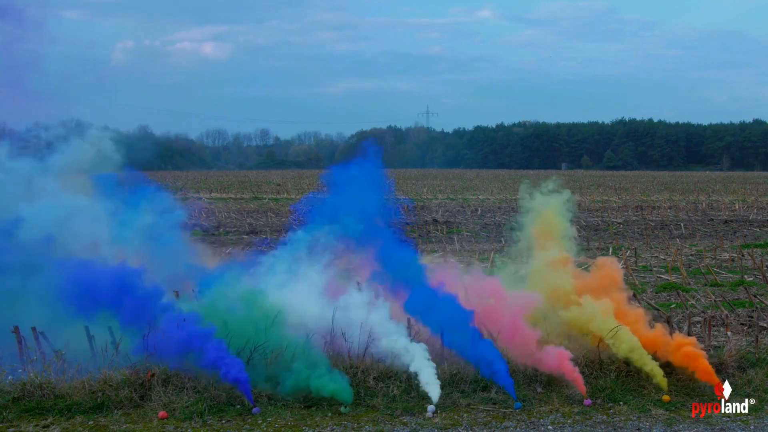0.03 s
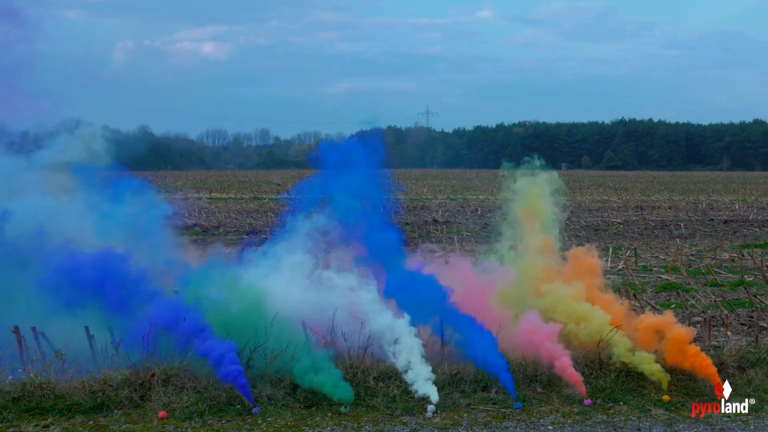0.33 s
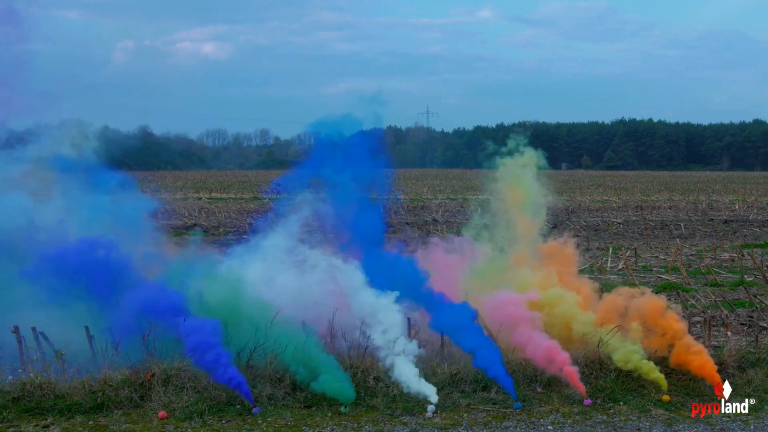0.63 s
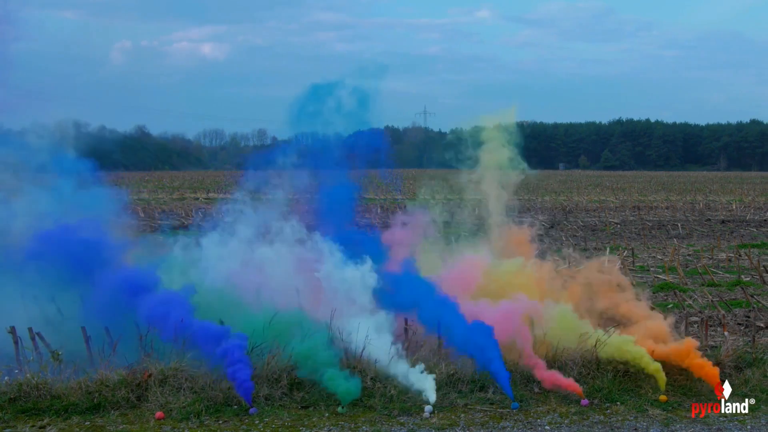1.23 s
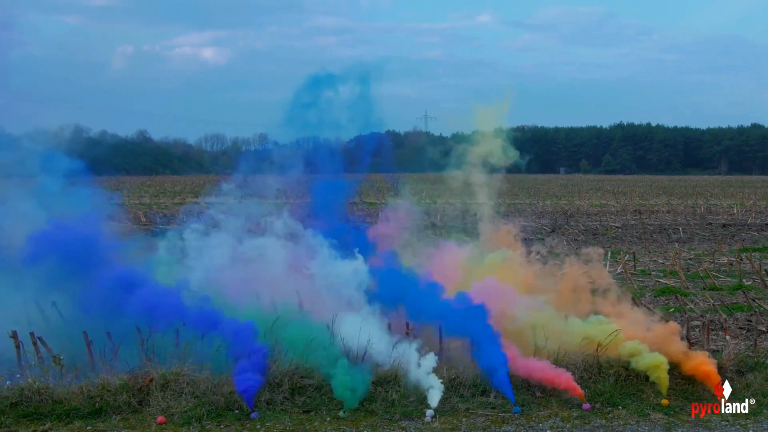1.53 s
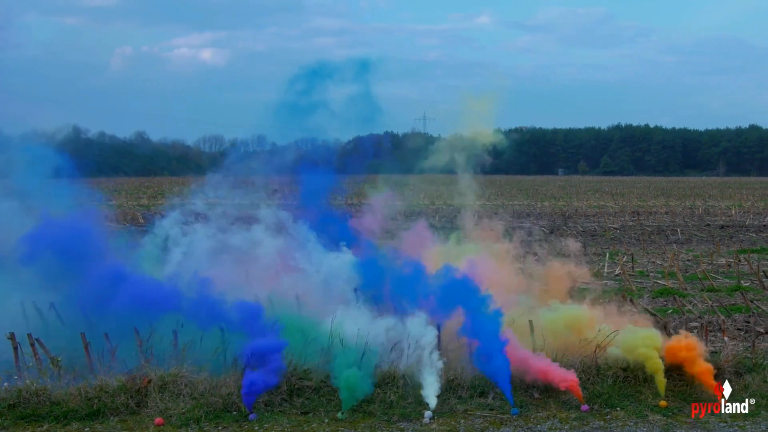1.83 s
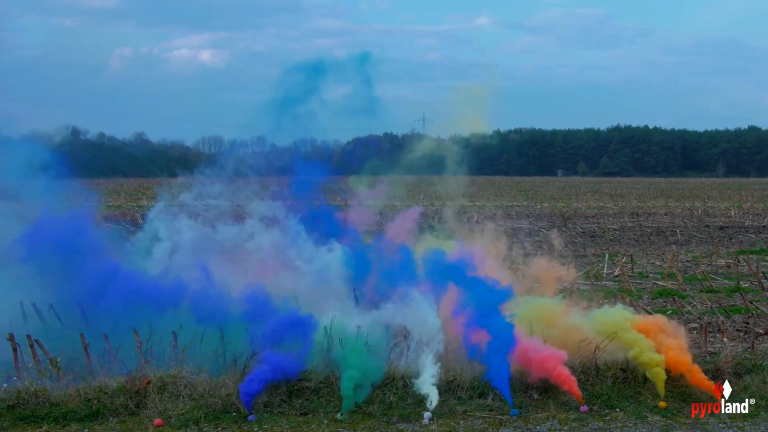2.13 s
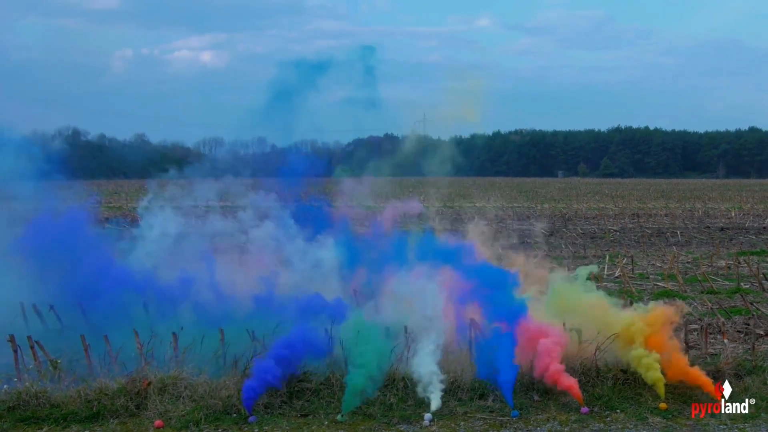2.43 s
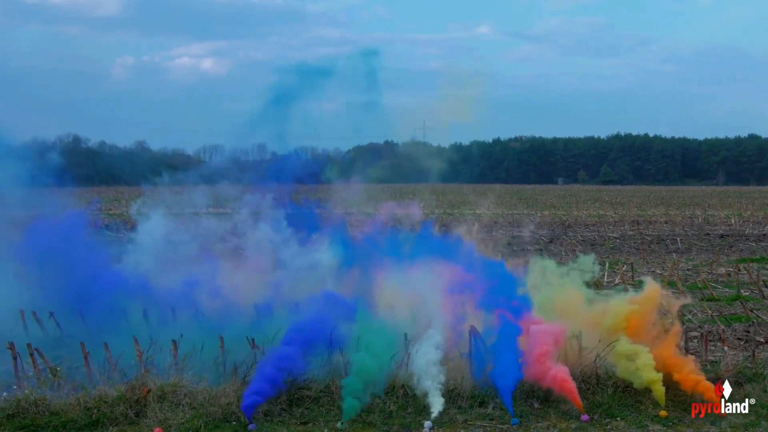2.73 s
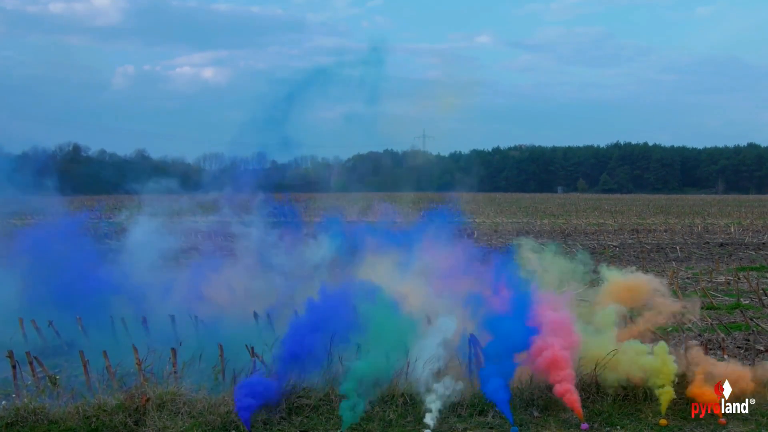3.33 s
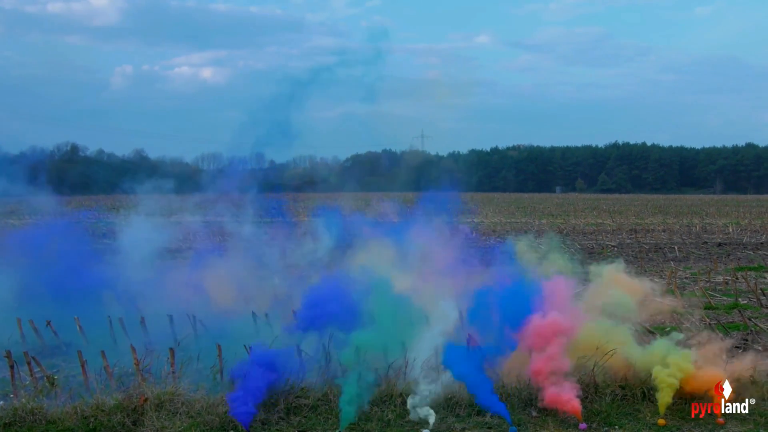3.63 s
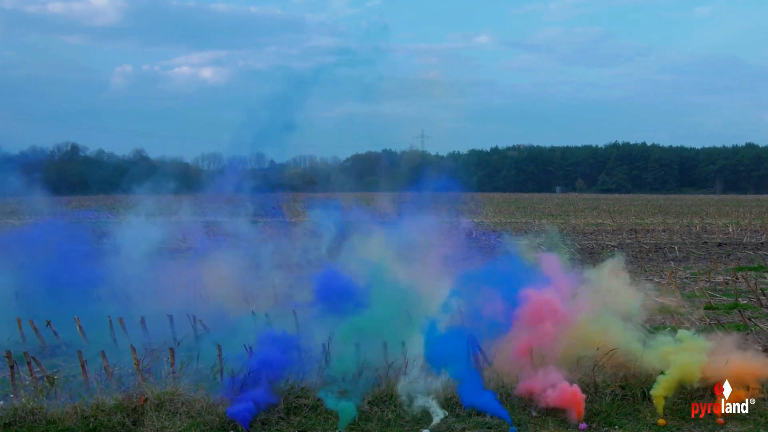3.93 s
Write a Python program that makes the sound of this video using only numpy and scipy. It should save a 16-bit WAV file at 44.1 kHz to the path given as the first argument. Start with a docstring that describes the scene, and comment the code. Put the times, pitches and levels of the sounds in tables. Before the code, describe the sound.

Smoke canisters hiss thin and high for all four seconds in an open field, swirling slightly over a soft rush. Low wind buffets the microphone from the start, mostly on the left, then the right, dying away by about 2.3 seconds. Near 0.8 seconds one canister crackles briefly, ending in a small hollow pop at 0.9. Faint sparks tick around 1.4 and 3.4 seconds.

```python
"""A thin, high hiss under low buffets of wind: a row of smoke devices burns on an open field.
Gas and fine sparks leave the nozzles over the soft rush of the jets; drifting echoes make both swirl.
One charge sputters and pops just before the first second, and two stray sparks tick.
Wind hits the two microphone ports in turn and dies away after two seconds, leaving the
hiss and a faint distant rumble."""
import sys
import numpy as np
from scipy import signal
from scipy.fft import rfft, irfft
from scipy.io import wavfile
from scipy.ndimage import uniform_filter1d

SR = 44100
rng = np.random.default_rng(int(sys.argv[2]) if len(sys.argv) > 2 else 0)


def transcribe(u):
    """Save the signal u as a 16-bit wav file named by the first command-line argument.

    u: samples, shape (n,) or (channels, n), limited to [-1, 1]; the rate is SR.
    q: integer samples, one column per channel.
    """
    v = np.clip(np.atleast_2d(u).T, -1, 1)
    q = np.round(v * 32767).astype(np.int16)
    wavfile.write(sys.argv[1], SR, q)


N = 176400
TIME = np.arange(N) / SR


# Each row: frequency in Hz, density in dB.
HISS_SPECTRUM = [(2500, -32), (4200, -33), (5500, -19), (7000, -12.5), (8500, -8.5), (9300, -4), (10000, 0),
                 (10900, -1), (11800, -8), (13500, -10), (14400, -14.5), (15000, -27)]
AIR_SPECTRUM = [(8000, -30), (11000, -5), (12000, 0), (13500, -2), (14500, -3), (15200, -12)]
# Each row: time in seconds, level in dB.
HISS_LEVEL = [(0, -62.3), (.3, -62), (.7, -63), (1.1, -64), (1.42, -64), (1.49, -61.8), (1.72, -63.3),
              (1.85, -64.3), (1.97, -63.3), (2.06, -65.3), (2.13, -63.8), (2.5, -65.3), (2.65, -65),
              (2.8, -62.5), (2.92, -61.6), (3.1, -64.2), (3.27, -64.6), (3.42, -62.7), (3.54, -64.6),
              (4, -65)]
AIR_LEVEL = [(0, -68), (.25, -67), (.7, -73), (1.2, -76), (1.6, -81), (2, -90), (3.2, -78), (3.42, -71),
             (3.55, -91), (4, -84)]

def hiss(sparks_per_s=660, sparks_db=-9, flicker_db=.45):
    """Gas and fine sparks leave the nozzles: a swirling jet with an airy top, over two lower sizzles."""
    gas_and_sparks = white() + from_db(sparks_db) * grains(sparks_per_s)
    jet = from_db(in_time(HISS_LEVEL)) * unit_rms(colour(airborne(gas_and_sparks), HISS_SPECTRUM))
    air = from_db(in_time(AIR_LEVEL)) * unit_rms(colour(airborne(white()), AIR_SPECTRUM))
    lower = sizzle(FIRST_SIZZLE_LEVEL, FIRST_ECHO) + sizzle(SECOND_SIZZLE_LEVEL, SECOND_ECHO)
    return from_db(flicker_db * drift(rate_hz=26)) * (swirl(jet + air) + lower)


# Each row: frequency in Hz, density in dB.
SIZZLE_SPECTRUM = [(2500, -30), (3500, -9), (4300, -4), (5600, 2), (6800, -1), (9000, -7), (14000, -20)]
# Each row: time in seconds, level in dB.
FIRST_SIZZLE_LEVEL = [(0, -81), (.5, -79), (.75, -73), (1.15, -73.5), (1.35, -83), (1.7, -82), (1.92, -75),
                      (2.15, -76), (2.58, -76), (2.85, -84), (3.1, -99), (4, -106)]
SECOND_SIZZLE_LEVEL = [(0, -95), (2.5, -91), (2.75, -79), (2.9, -75), (3.1, -76), (3.38, -72.5),
                       (3.55, -76.5), (3.75, -85), (4, -88)]
# Each row: time in seconds, delay in ms, echo gain in dB.
FIRST_ECHO = [(0, 1.0, -20), (1.15, 1.03, -18), (1.7, 1.07, -9), (1.95, 1.095, -4), (2.08, 1.11, 0),
              (2.5, 1.14, 0), (2.8, 1.19, -2), (4, 1.4, -6)]
SECOND_ECHO = [(0, .9, -6), (2.75, .893, -1), (2.95, .916, -1), (3.15, .955, 0), (3.35, .988, 0),
               (3.6, 1.05, 0), (4, 1.25, -3)]

def sizzle(level, echo, correlation=.85):
    """One jet with an inverted echo: hollow bands that sink as the delay grows."""
    noise = np.sqrt(correlation) * rng.standard_normal(N) + np.sqrt(1 - correlation) * white()
    jet = colour(noise, SIZZLE_SPECTRUM)
    reflection = from_db(in_time(echo, column=2)) * delayed(jet, in_time(echo))
    return from_db(in_time(level)) * unit_rms(jet - reflection)


# Each row: frequency in Hz, left density in dB, right density in dB.
RUSH_SPECTRUM = [(195, -22, -6.5), (590, -9.5, -2.5), (906, -0.5, 0), (1170, 0.5, -5.5), (1430, -2.5, -13),
                 (2000, -2, -10.5), (2600, -6.5, -15), (3380, -14, -15.5), (3810, -9.5, -16),
                 (5850, -24, -23.5), (9200, -19, -31)]
# Each row: time in seconds, level in dB.
RUSH_LEVEL = [(0, -62.5), (.7, -63), (1.3, -64), (1.55, -62.5), (1.92, -62.5), (2.05, -67), (2.6, -67.5),
              (2.9, -67), (3.4, -67), (4, -66.5)]

def rush(flicker_db=1.15):
    """The soft, lower roar of the plumes, swirling like the hiss."""
    left, right = airborne(white())
    roar = unit_rms(np.array([colour(left, RUSH_SPECTRUM), colour(right, RUSH_SPECTRUM, column=2)]))
    return from_db(in_time(RUSH_LEVEL) + flicker_db * drift(rate_hz=15.5)) * swirl(roar)


# Each row: time in seconds, delay in ms, left echo gain in dB.
SWIRL_ECHO = [(0, 1.0, -24), (1.0, .97, -16), (1.2, .87, -12), (1.42, .785, -12), (1.65, .76, -9.5),
              (1.9, .844, -10), (2.2, .842, -12), (2.5, .856, -11), (2.75, .866, -9), (2.95, .884, -7),
              (3.15, .914, -7), (3.35, .952, -7), (3.55, 1.03, -10), (3.75, 1.13, -12), (4, 1.28, -12)]

def swirl(x, wobble_ms=.002, right_db=-8, late_db=-14, late_ratio=1.3):
    """Two inverted echoes with drifting delays comb the sound, most at the left port."""
    delay_ms = in_time(SWIRL_ECHO) + wobble_ms * drift(rate_hz=4.2)
    first_gain = from_db(in_time(SWIRL_ECHO, column=2) + np.array([[0], [right_db]]))
    late_gain = first_gain * from_db(late_db)
    combed = x - first_gain * delayed(x, delay_ms) - late_gain * delayed(x, delay_ms * late_ratio)
    return combed / np.sqrt(1 + first_gain ** 2 + late_gain ** 2)


# Each row: time in seconds, level in dB.
WHISTLE_LEVEL = [(0, -104), (1.5, -75), (1.72, -66.5), (1.95, -69.5), (2.3, -73), (3.2, -73.5), (4, -78.5)]

def whistle(centre_hz=1480, width_hz=190):
    """A breathy resonance of one nozzle, to the left."""
    radius = np.exp(-np.pi * width_hz / SR)
    poles = [1, -2 * radius * np.cos(2 * np.pi * centre_hz / SR), radius * radius]
    tone = signal.lfilter([1, 0, -1], poles, white())
    return pan(left_db=8) * from_db(in_time(WHISTLE_LEVEL)) * unit_rms(tone)


# Each row: centre in seconds, length in seconds, level in dB, extra crack in dB.
SPUTTER_BURSTS = [(.756, .003, -55, 6), (.7613, .004, -45, -2), (.7735, .0045, -47.3, 2),
                  (.7955, .003, -49.5, 1), (.801, .007, -50, 1), (.82, .012, -54, -3),
                  (.8325, .007, -47, 4.8), (.852, .018, -53, 0), (.882, .018, -54, -2),
                  (.905, .009, -54.5, -4)]
# Each row: frequency in Hz, density in dB.
SPUTTER_SPECTRUM = [(200, 7), (600, 4), (1200, 4.5), (2400, 3), (3400, -1.5), (4600, -4), (6500, -1),
                    (8500, 3), (10500, 4), (13000, -0.5), (15500, 0.5)]

def sputter(grains_per_s=14000, crack_hz=(1510, 4660), tail_s=.1, tail_db=-6):
    """One charge spits dense bursts, some with a harder crack, which fade across the field."""
    power = sum(burst_power(s, length, db) for s, length, db, _ in SPUTTER_BURSTS)
    crack_power = sum(burst_power(s, length, db + extra) for s, length, db, extra in SPUTTER_BURSTS)
    decay = np.exp(-1 / (tail_s * SR))
    tail = from_db(tail_db) * np.sqrt(signal.lfilter([1 - decay], [1, -decay], power + 1e-18))
    crackle = unit_rms(colour(airborne(grains(grains_per_s)), SPUTTER_SPECTRUM))
    wash = unit_rms(colour(airborne(white()), SPUTTER_SPECTRUM))
    crack_band = signal.sosfiltfilt(butter(crack_hz, "band"), crackle)
    crack = pan(left_db=-11.5) * np.sqrt(crack_power) * crack_band
    return np.sqrt(power) * (crackle - crack_band) + crack + tail * wash


# Each row: frequency in Hz, relative level in dB, T60 in seconds.
POP_MODES = [(498, -1, 0.02), (625, -2, .02), (730, -1, 0.021), (775, -5.5, 0.018), (1490, -9, 0.012)]

def pop(start_s=.908, level_db=-38.5, attack_s=.00089):
    """The sputter ends in a small hollow pop of damped modes."""
    age_s = np.maximum(TIME - start_s, 0)
    ring = sum(from_db(level_db + db - 60 * age_s / t60_s) * np.sin(2 * np.pi * hz * age_s)
               for hz, db, t60_s in POP_MODES)
    return pan(left_db=-4.5) * (1 - np.exp(-age_s / attack_s)) * ring


# Each row: centre in seconds, level in dB, band centre in Hz.
SPARK_TICKS = [(1.441, -60, 2000), (3.361, -66.5, 3780)]

def ticks(length_s=.0032, band_ratio=1.33):
    """Lone sparks: very short puffs of narrow noise."""
    out = np.zeros((2, N))
    for s, db, hz in SPARK_TICKS:
        noise = signal.sosfilt(butter([hz / band_ratio, hz * band_ratio], "band"), white())
        out += from_db(db) * swell(s, length_s) * unit_rms(noise)
    return out


# Each row: time in seconds, level in dB.
WIND_LEFT_LEVEL = [(0, -49), (.06, -50), (.14, -44), (.26, -46.5), (.31, -45.5), (.42, -45.5), (.52, -64),
                   (.6, -41.5), (.65, -46), (.69, -43), (.74, -47), (1.05, -47.5), (1.14, -50.5),
                   (1.2, -43), (1.28, -55.5), (1.33, -44), (1.41, -45), (1.46, -49.5), (1.61, -46),
                   (1.66, -59), (1.8, -61.5), (2.3, -79), (4, -97)]
WIND_RIGHT_LEVEL = [(0, -61), (.9, -60.5), (1.1, -53.5), (1.3, -61), (1.6, -57), (1.85, -62), (1.95, -59.5),
                    (2.2, -64.5), (2.35, -95), (4, -87)]

def wind(leak_db=-15, leak_lag_ms=.13):
    """Each port has its own wind and leaks, slightly late, into the other channel."""
    left = turbulence(WIND_LEFT_LEVEL, port=0) + vortex_hum()
    right = turbulence(WIND_RIGHT_LEVEL, port=1)
    ports = np.array([left, right]) + thumps()
    return ports + from_db(leak_db) * delayed(ports[::-1], leak_lag_ms)


# Each row: centre in seconds, length in seconds, level in dB, port (0 left, 1 right).
GUSTS = [(.005, 0.0098, -40.5, 0), (0.097, 0.023, -37.5, 0), (0.11, 0.049, -46, 1),
         (0.446, 0.008, -37.5, 0), (0.519, 0.077, -38.5, 0), (0.996, 0.013, -38.5, 0),
         (1.002, 0.026, -44.5, 1), (1.511, 0.045, -44.5, 1), (1.641, 0.03, -44.5, 1),
         (1.719, 0.036, -38.5, 1), (1.835, 0.031, -49, 1), (2.166, 0.019, -49.5, 1),
         (2.219, 0.033, -45.5, 1)]
# Each row: frequency in Hz, density in dB.
TURBULENCE_SPECTRUM = [(20, -76), (40, -28), (65, -2.5), (95, 0), (130, -0.5), (190, -5), (270, -13),
                       (380, -21.5), (600, -37), (1200, -62), (4000, -110)]

def turbulence(steady_level, port, edge_hz=167, edge_unity_db=-43, edge_exponent=.45):
    """Steady wind plus gusts on one port, brighter as the force grows."""
    gust_power = sum(burst_power(s, length, db) for s, length, db, side in GUSTS if side == port)
    force = np.sqrt(from_db(in_time(steady_level)) ** 2 + gust_power)
    air = colour(rng.standard_normal(N), TURBULENCE_SPECTRUM)
    air /= np.sqrt(uniform_filter1d(air ** 2, size=1800))  # unit power over 41 ms
    edge = signal.sosfiltfilt(butter(edge_hz, "high"), air)
    edge_gain = (force / from_db(edge_unity_db)) ** edge_exponent
    return force * (air - edge + edge_gain * edge)


# Each row: start in seconds, peak in dB, band centre in Hz, port (0 left, 1 right).
EDDY_THUMPS = [(.875, -32, 130, 0), (.982, -32, 149, 0), (1.037, -22, 164, 1), (1.053, -27.5, 121, 1),
               (1.176, -39.5, 168, 0), (1.232, -30, 233, 0), (1.241, -36, 163, 0), (1.253, -40, 324, 0),
               (1.316, -35.5, 148, 0), (1.375, -34.5, 185, 0), (1.715, -35.5, 168, 1)]

def thumps(band_ratio=1.314):
    """Each eddy is one pressure kick on its port that swings out within a few cycles."""
    out = np.zeros((2, N))
    for s, db, hz, port in EDDY_THUMPS:
        impulse = signal.unit_impulse(N, int(s * SR)) + 1e-18
        kick = signal.sosfilt(butter([hz / band_ratio, hz * band_ratio], "band"), impulse)
        kick = signal.sosfilt(butter(2 * hz, "low"), kick)
        out[port] -= from_db(db) * kick / np.abs(kick).max()
    return out


def vortex_hum(centre_s=.346, length_s=.067, shedding_hz=129, level_db=-37.5, wobble=.047):
    """For a moment vortices shed regularly and the wind hums."""
    phase = 2 * np.pi * np.cumsum(shedding_hz * (1 + wobble * drift(rate_hz=21))) / SR
    return from_db(level_db) * swell(centre_s, length_s) * unit_rms(np.sin(phase))


# Each row: frequency in Hz, density in dB.
RUMBLE_SPECTRUM = [(25, -35), (50, -12), (85, -5), (130, -0.5), (180, -11), (300, -11.5), (500, -11.5),
                   (750, -16), (1200, -23), (3000, -51)]

def rumble(level_db=-65):
    """Faint distant rumble of the open land."""
    return from_db(level_db) * unit_rms(colour(airborne(white()), RUMBLE_SPECTRUM))


# Each row: frequency in Hz, left-right correlation before clipping.
PORT_CORRELATION = [(60, 0.94), (300, 1), (600, 0.86), (1100, 0.0079), (3000, 0.13), (4200, -1.58),
                    (6000, -0.084), (8000, 0.25), (9900, 0.73), (11800, 0.43), (15000, 0.015)]

def airborne(pair):
    """Blend two unrelated signals to the correlation of airborne sound at the ports."""
    correlation = np.clip(per_bin(PORT_CORRELATION), -.99, .99)
    mid, side = rfft(pair)
    spectra = np.sqrt(1 + correlation) * mid + np.sqrt(1 - correlation) * side * [[1], [-1]]
    return unit_rms(irfft(spectra, N))


def from_db(db):
    """Decibels to gain."""
    return 10 ** (np.asarray(db) / 20)


def unit_rms(x):
    """Scale to unit power."""
    return x / np.sqrt(np.mean(x ** 2) + 1e-20)


def in_time(rows, column=1):
    """One column of a curve at every sample."""
    rows = np.array(rows)
    return np.interp(TIME, rows[:, 0], rows[:, column])


def per_bin(rows, column=1):
    """One column of a spectrum at every FFT bin."""
    rows = np.array(rows)
    return np.interp(np.log(np.fft.rfftfreq(N, 1 / SR) + 1e-9), np.log(rows[:, 0]), rows[:, column])


def colour(x, spectrum, column=1):
    """Filter by a spectrum."""
    return irfft(rfft(x) * from_db(per_bin(spectrum, column)), N)


def butter(hz, kind):
    """Order-2 filter sections."""
    return signal.butter(2, hz, kind, fs=SR, output="sos")


def pan(left_db):
    """Stereo gains for a left-minus-right level."""
    return from_db(np.array([[left_db], [-left_db]]) / 2)


def delayed(x, ms):
    """Fractional delay, 4x oversampled."""
    fine = signal.resample_poly(x, 4, 1, axis=1)
    fine_s = np.arange(4 * N) / (4 * SR)
    return np.array([np.interp(TIME - ms / 1000, fine_s, channel) for channel in fine])


def drift(rate_hz):
    """Slow random wander of unit RMS, drawn every 40 samples."""
    pole = np.exp(-80 * np.pi * rate_hz / SR)
    slow = signal.lfilter([1], [1, -2 * pole, pole * pole], rng.standard_normal(N // 40 + 2002))[2000:]
    return np.interp(np.arange(N) / 40, np.arange(len(slow)), unit_rms(slow))


def swell(centre_s, length_s):
    """Bell of height 1, length_s wide at half power."""
    return np.exp(-2 * np.log(2) * ((TIME - centre_s) / length_s) ** 2)


def burst_power(centre_s, length_s, db):
    """Power envelope of one swell."""
    return (from_db(db) * swell(centre_s, length_s)) ** 2


def white():
    """Two unrelated noises."""
    return rng.standard_normal((2, N))


def grains(per_s):
    """Two trains of random clicks of uneven size."""
    return unit_rms(white() * (rng.random((2, N)) < per_s / SR))


def scene():
    """The burning devices, the wind and the land around."""
    return hiss() + rush() + whistle() + sputter() + pop() + ticks() + wind() + rumble()


def record(dry, cutoff_hz=15200):
    """Steep low-pass."""
    return signal.sosfilt(signal.ellip(10, .1, 80, cutoff_hz, fs=SR, output="sos"), dry)


dry = scene()
out = record(dry)
transcribe(out)
```